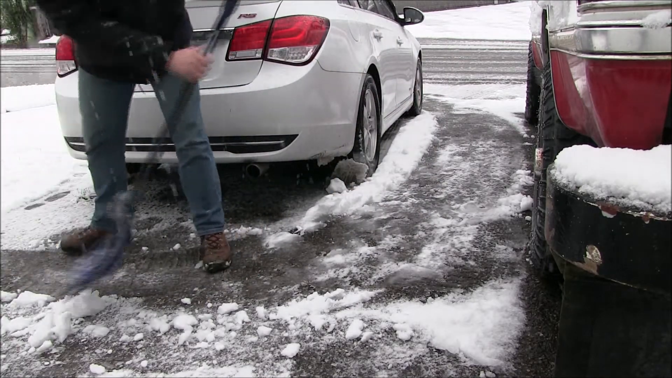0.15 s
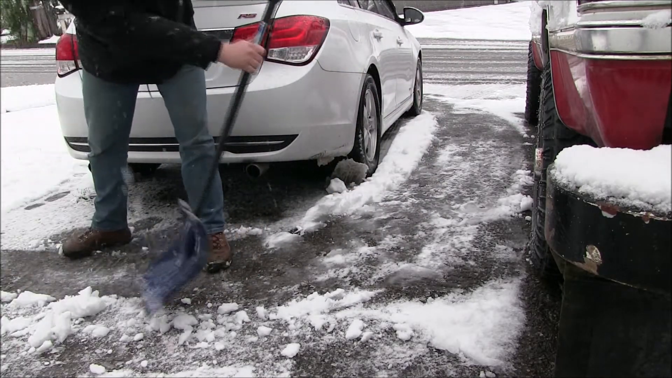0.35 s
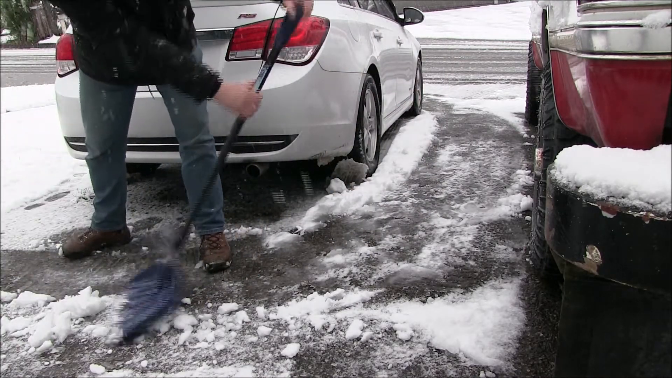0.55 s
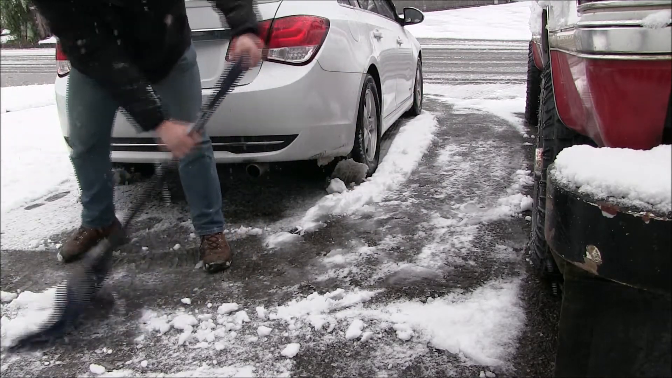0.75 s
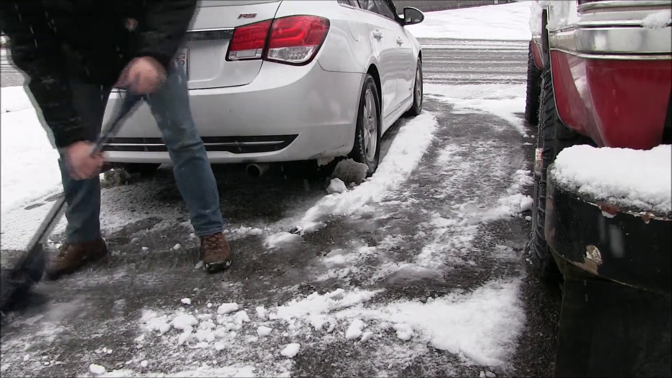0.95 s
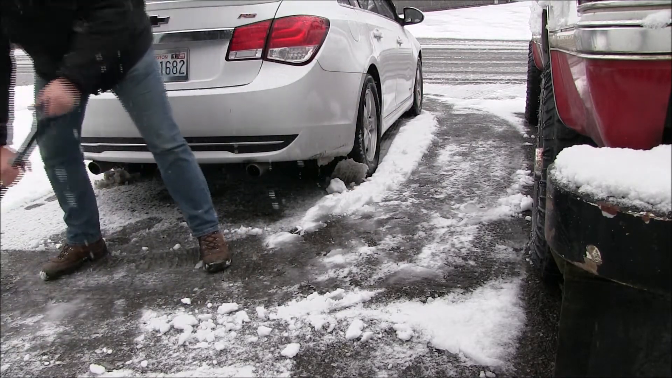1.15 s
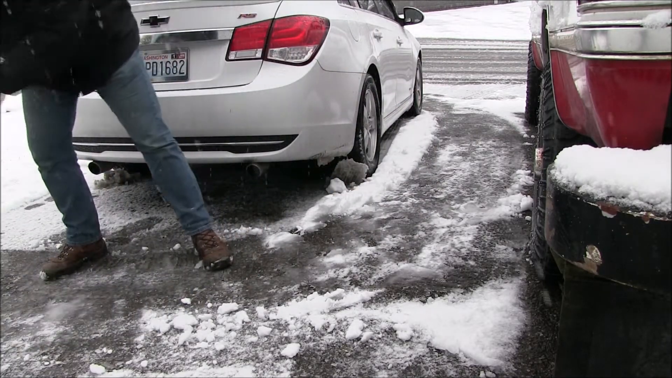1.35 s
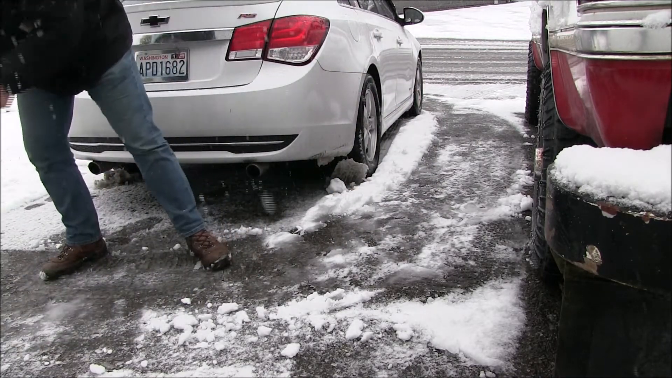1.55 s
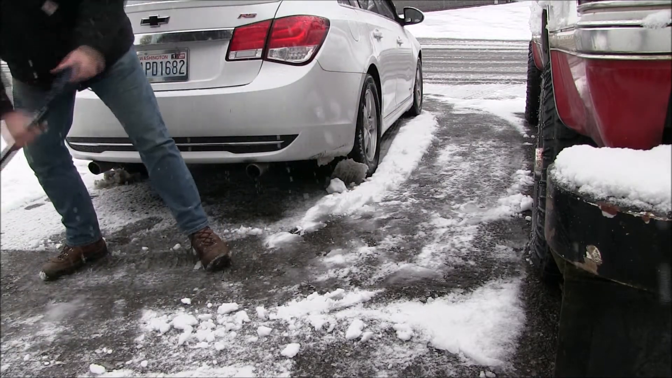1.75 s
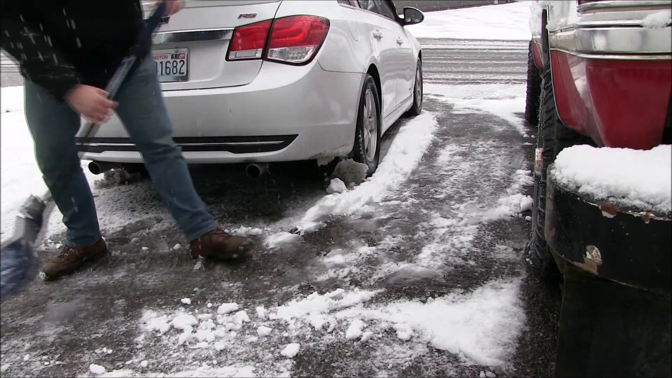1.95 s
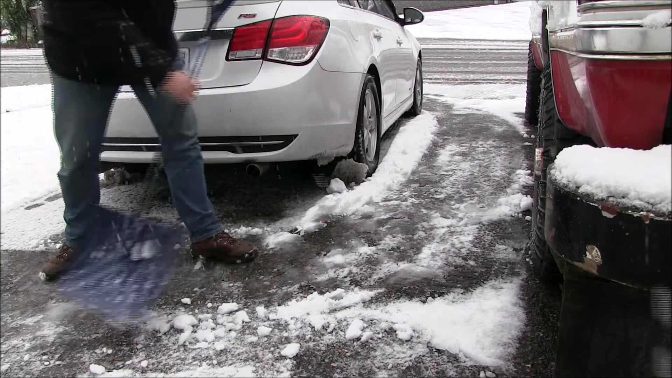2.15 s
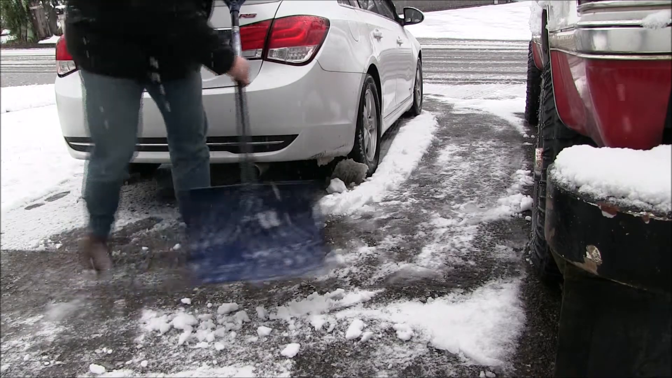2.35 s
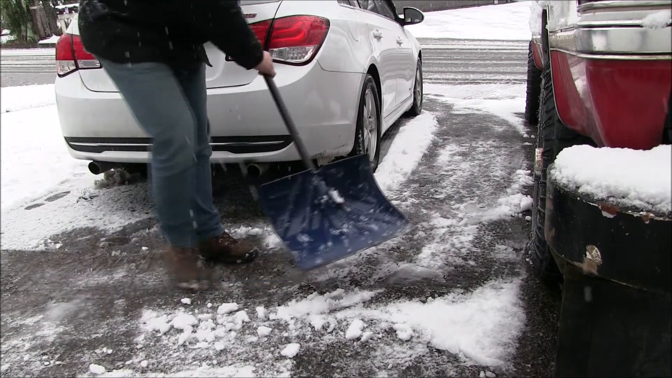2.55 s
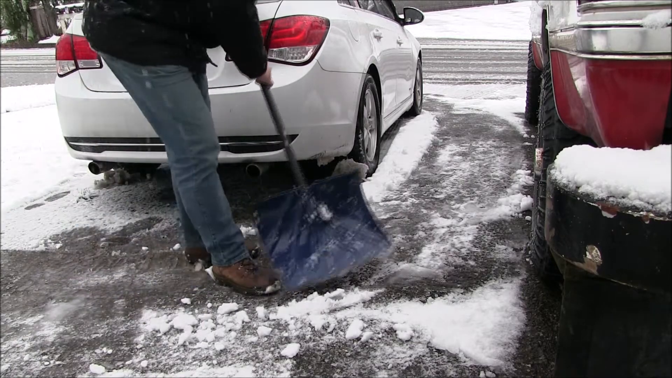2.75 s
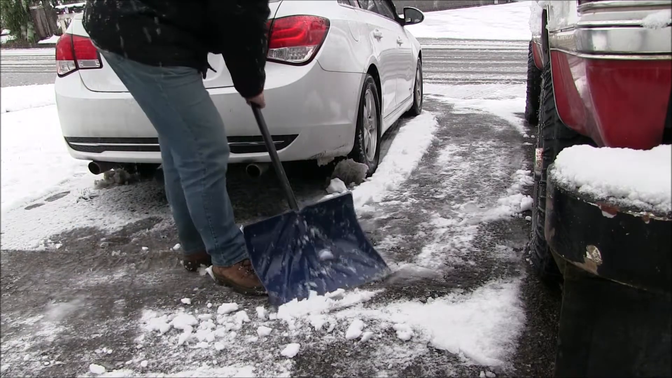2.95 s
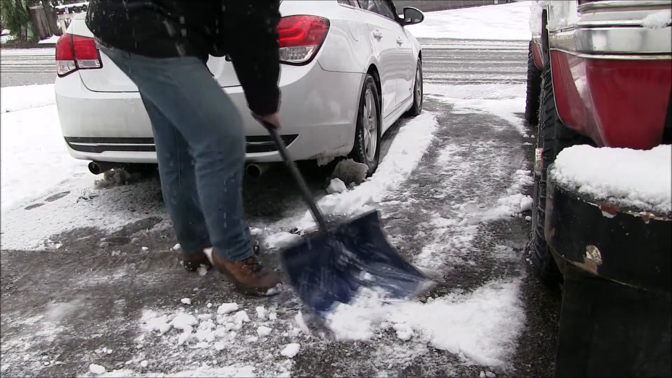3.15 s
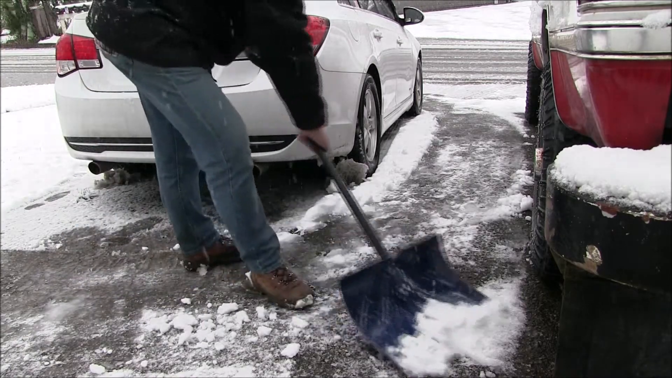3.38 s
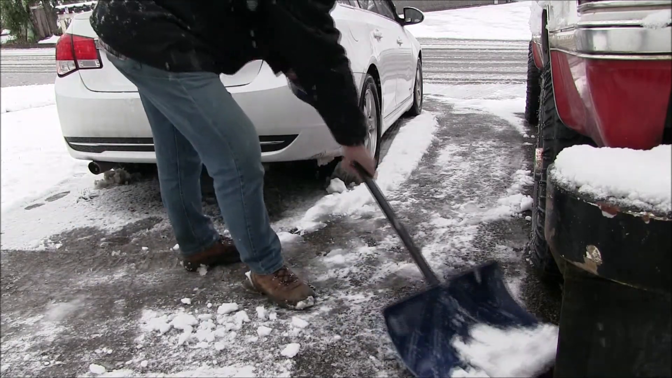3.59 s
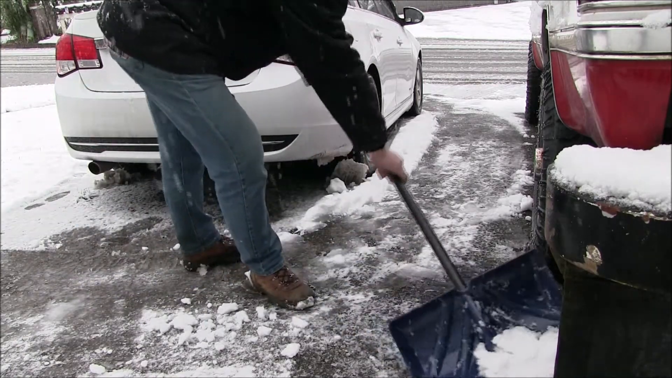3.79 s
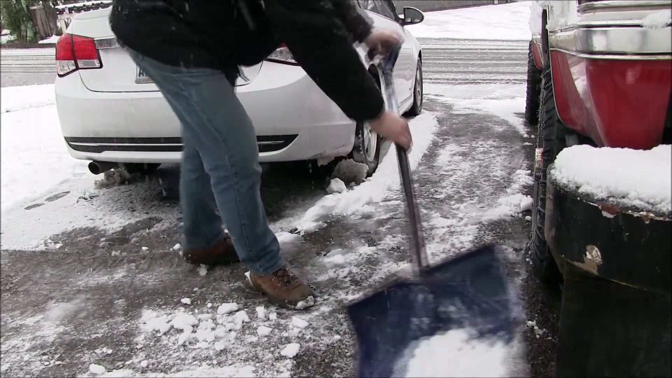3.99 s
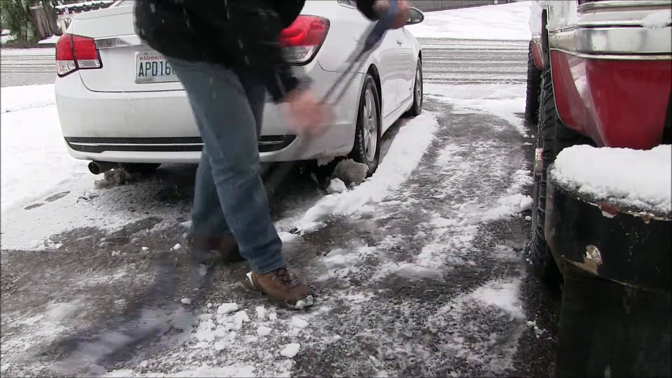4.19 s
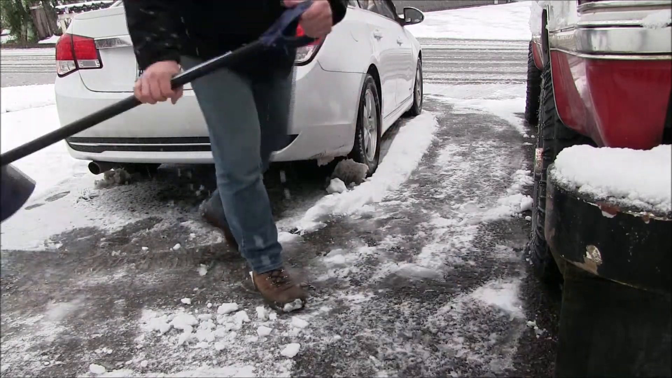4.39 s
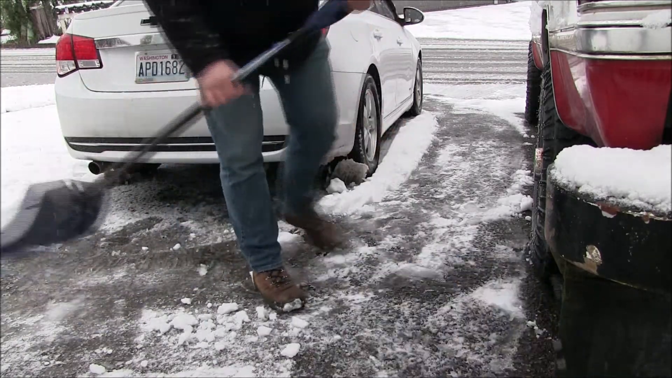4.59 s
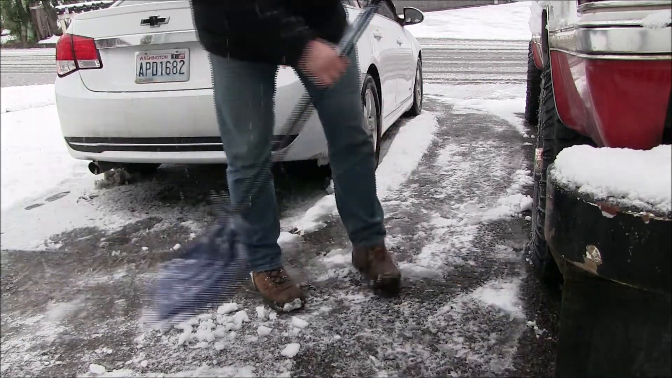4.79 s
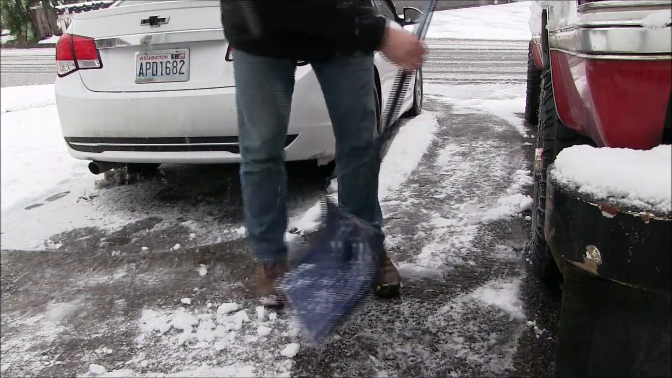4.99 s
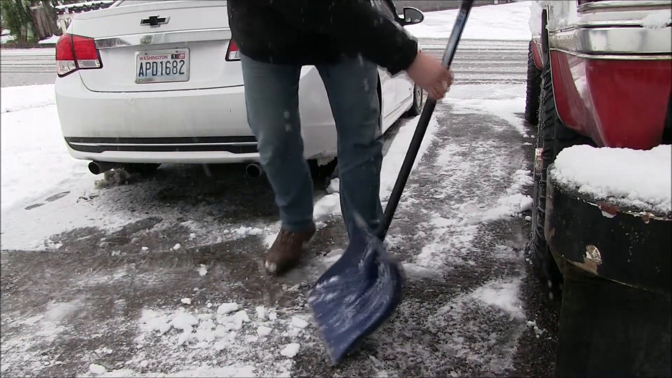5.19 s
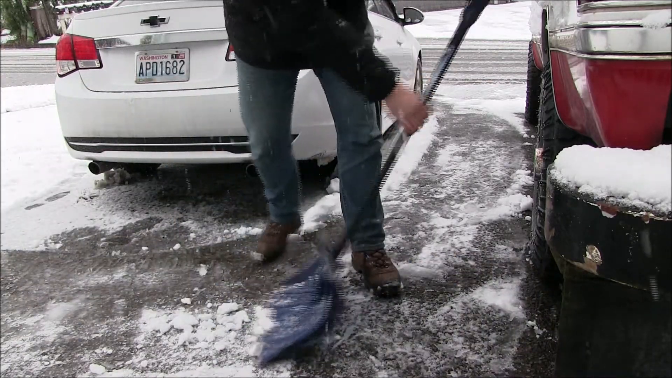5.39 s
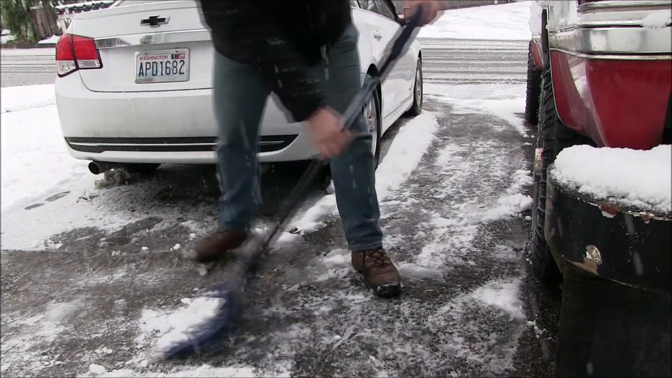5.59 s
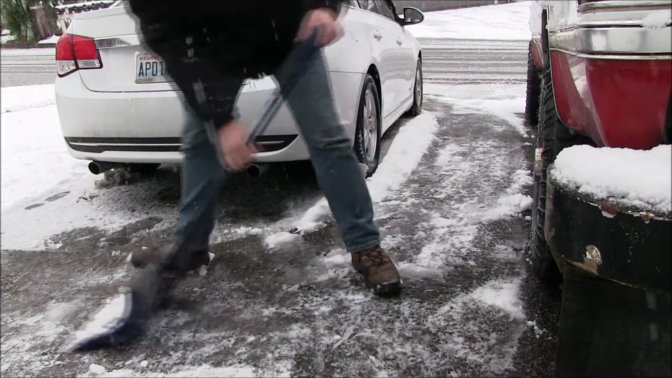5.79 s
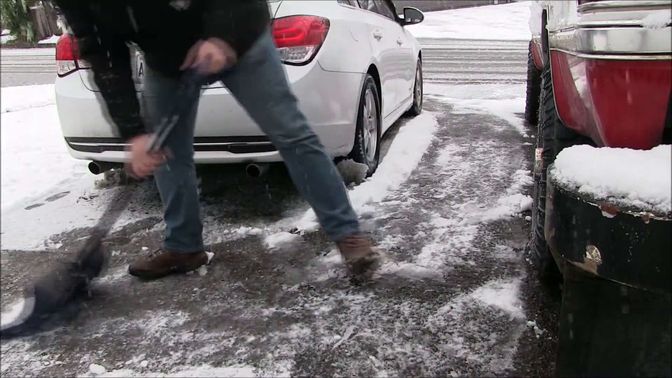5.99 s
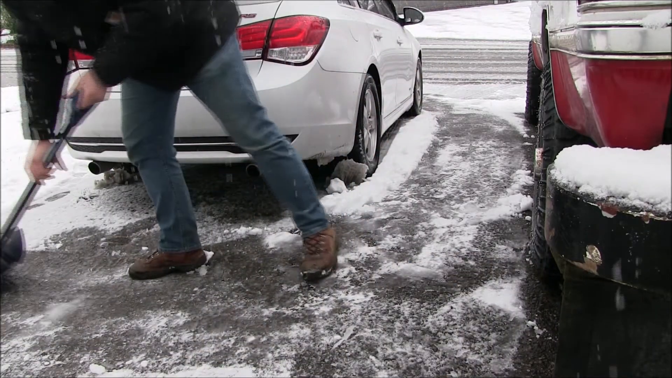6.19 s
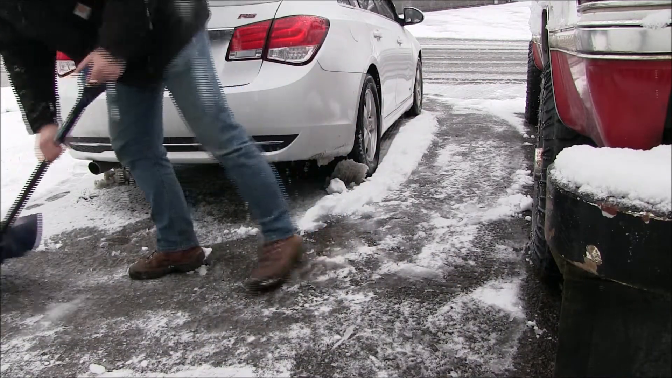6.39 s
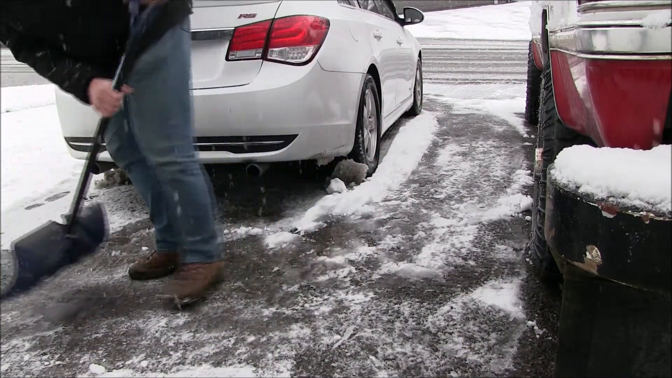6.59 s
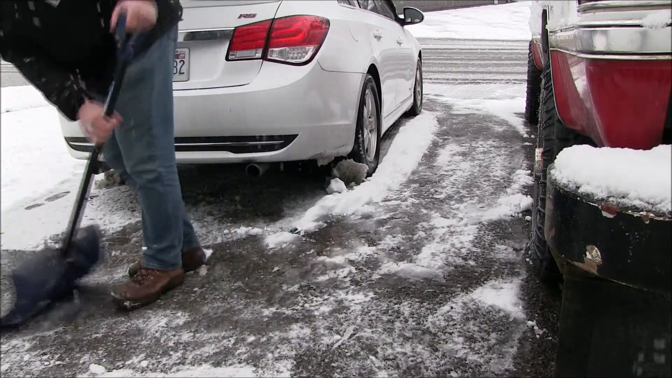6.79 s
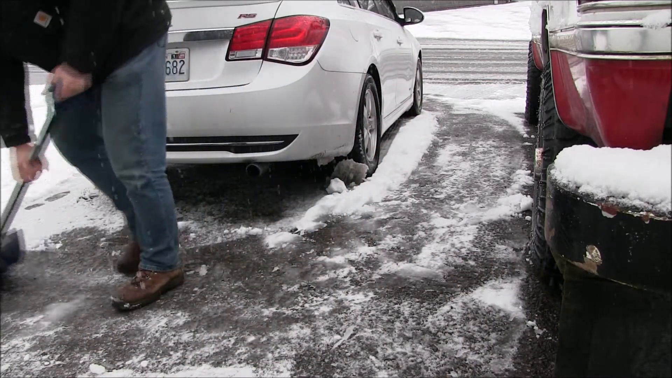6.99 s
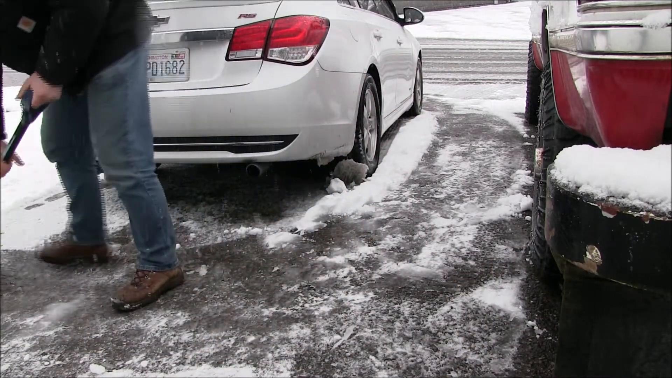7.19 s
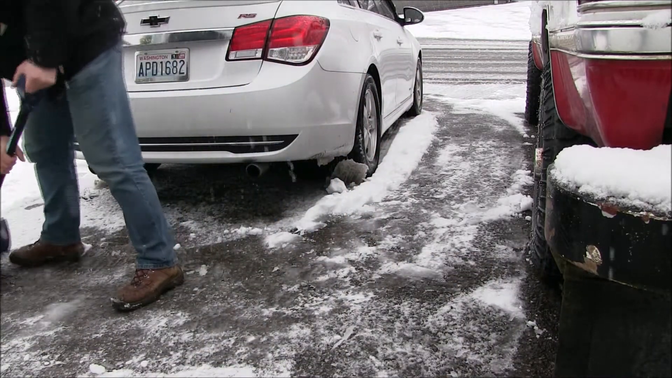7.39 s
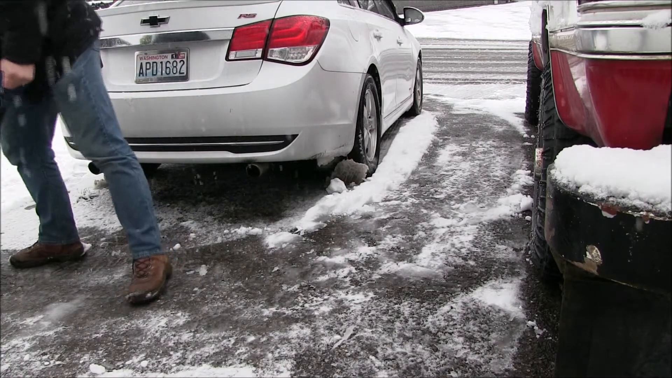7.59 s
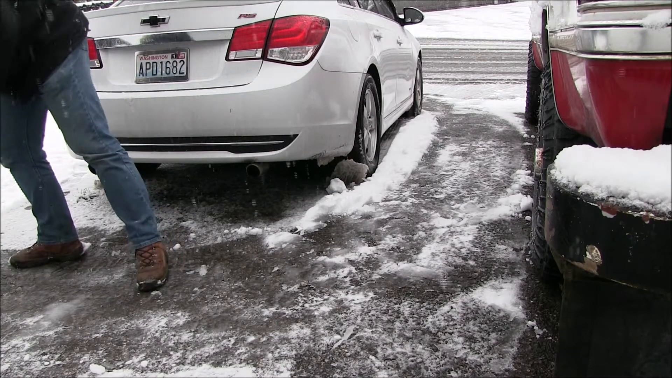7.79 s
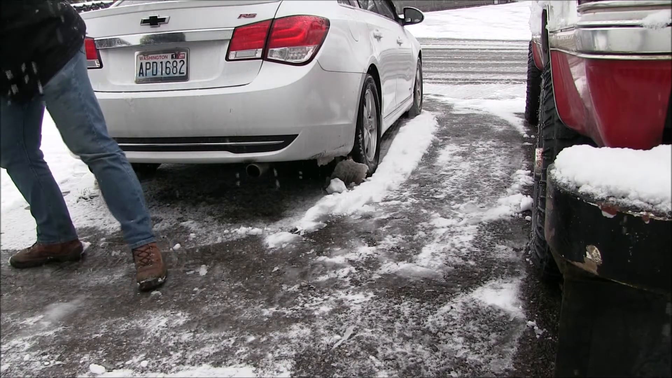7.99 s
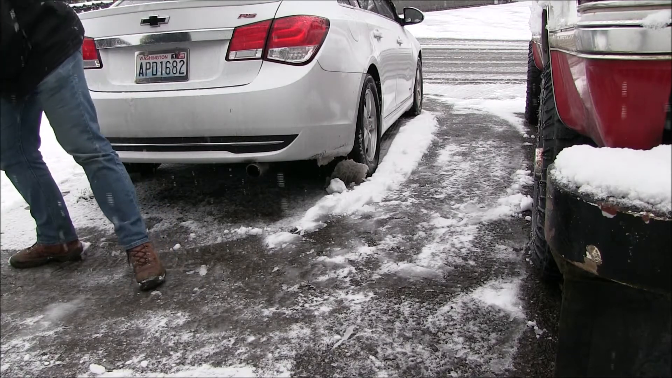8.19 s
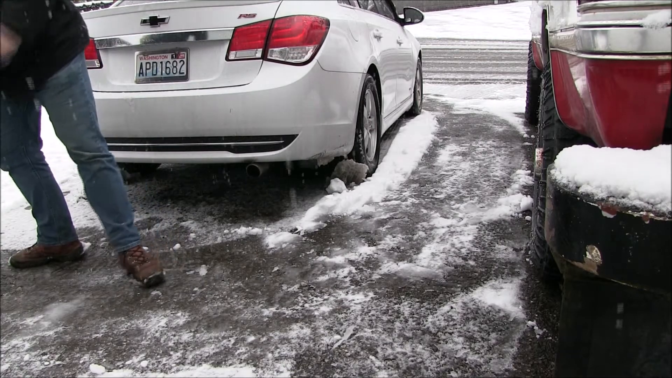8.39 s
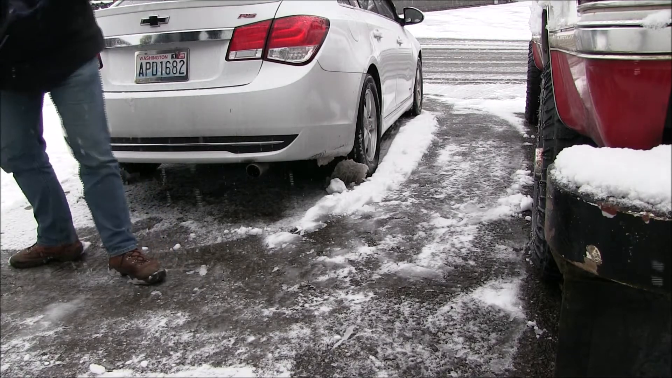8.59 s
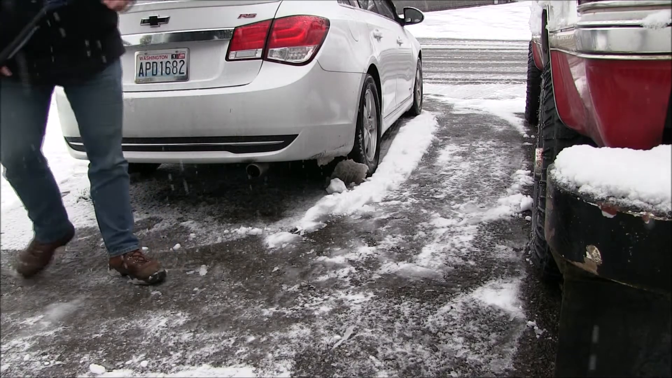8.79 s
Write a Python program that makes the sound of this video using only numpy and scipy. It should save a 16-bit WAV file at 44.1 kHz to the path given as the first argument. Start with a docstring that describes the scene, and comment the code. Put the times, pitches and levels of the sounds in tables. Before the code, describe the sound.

Close outdoor sound in a wet, snowy driveway with faint street rush behind. Small ice ticks and a soft slush shuffle open. From about 0.6 to 1.3 seconds the plastic shovel knocks and scrapes in a bright, rough sideways stroke. Until 2.8 seconds there are only quiet squelches, spatter and boot shuffles. At 2.9 a heavier hollow push grinds through slush until about 3.7, with low boom and gritty rasp, then slush plops around 3.7, 4.4 and 5. Another push runs from 5.3 to 6, turning into a brisk sweep until 6.3. Shorter choppy ploughing scrapes with thumps and clacks follow at 6.8 to 7.2 and 7.4 to 7.9. A soft squelch lands at 8. Wet tyre hiss, building gently, swells strongly after 8.3 with a faint falling engine hum, loudest at the end.

```python
"""A plastic snow shovel is set down on wet asphalt and shoved through slush, stroke after stroke.
Stick-slip bursts, sliding grains and grit ticks drive the blade's resonances; knocks add brief rattles.
Between strokes boots shuffle and slush lands, as swelling clumps of tiny bursts; crumbs of ice tick.
Behind is the rush of a wet street in filtered noise, where tyre hiss swells at the end.
The recorder's gain control ducks under loud strokes and gradually lets the street back in."""
import sys
import numpy as np
from scipy import signal
from scipy.fft import rfft, irfft, next_fast_len
from scipy.io import wavfile
from scipy.ndimage import uniform_filter1d, minimum_filter1d, map_coordinates

SR = 44100
rng = np.random.default_rng(int(sys.argv[2]) if len(sys.argv) > 2 else 0)


def int16_out(signal):
    """Quantize to a 16-bit WAV file."""
    q = np.round(np.clip(np.atleast_2d(signal).T, -1, 1) * 32767)
    wavfile.write(sys.argv[1], SR, q.astype(np.int16))


N = 390285


def amp(db):
    """Decibels to gain."""
    return 10 ** (np.asarray(db) / 20)


def unit(x):
    """Scaled to rms 1."""
    return x / np.sqrt(np.mean(x ** 2) + 1e-20)


def along(points, hz):
    """(Hz, value) points read on a log frequency axis."""
    f, v = np.transpose(points)
    return np.interp(np.log(hz + 1), np.log(f + 1), v)


def wobble(rate):
    """A smooth random curve, rate knots a second."""
    knots = rng.standard_normal(int(N * rate / SR) + 4)
    return map_coordinates(knots, [np.arange(N) * rate / SR])


def coloured(x, level_db, size=8192):
    """x through the causal, minimum-phase filter whose gain is level_db(Hz)."""
    gain = amp(level_db(np.fft.rfftfreq(size, 1 / SR)))
    cepstrum = irfft(np.log(np.maximum(gain, 1e-6)))
    # folding the cepstrum onto positive time makes the filter causal
    cepstrum[1:size // 2] *= 2
    cepstrum[size // 2 + 1:] = 0
    impulse = irfft(np.exp(rfft(cepstrum)))
    return signal.fftconvolve(x, impulse)[:len(x)]


def split(x, edges_hz, order=6):
    """Adjacent bands that add up to x."""
    m = next_fast_len(len(x) + SR // 10)
    hz = np.fft.rfftfreq(m, 1 / SR)
    below = [0 * hz] + [1 / (1 + (hz / edge) ** order) for edge in edges_hz] + [0 * hz + 1]
    return irfft(np.diff(below, axis=0) * rfft(x, m), m)[:, :len(x)]


def steady(x, seconds):
    """Slow level evened out to rms 1, the fine grain kept."""
    power = np.abs(uniform_filter1d(x ** 2, int(seconds * SR) + 1))
    return x / np.sqrt(power + 1e-12)


def grains(rate, spread_db):
    """Randomly timed contacts of log-normal size, about rate a second, rms 1."""
    size = amp(spread_db * np.clip(rng.standard_normal(N), -2, 2))
    struck = rng.random(N) < rate / SR
    return unit(struck * size * rng.choice([-1, 1], N))


def street(patter_db=-14, rush_db=-37.0, fizz_db=-54):
    """Distant traffic as coloured, wavering noise, with a fine patter of wet flakes."""
    # street colour: pitch_hz [Hz], gain_db [dB]
    street_tone = [(15, -61), (25, -24), (64, -6), (114, 1), (344, -8), (405, -6.5), (531, -7.5), (624, -8),
                   (840, -8), (1190, -9), (1890, -16.5), (2220, -24), (3160, -21), (11600, -37),
                   (16000, -41)]
    flakes = grains(160, spread_db=5)
    air = rng.standard_normal(N) + amp(patter_db) * flakes
    rumble, rush, fizz = split(coloured(air, lambda hz: along(street_tone, hz)), [220, 4000])
    body = unit(rumble * amp(2.8 * wobble(16)) + rush)
    top = unit(fizz * amp(0.3 * wobble(29)))
    return amp(rush_db) * body + amp(fizz_db) * top


def slush(level_db=0, clump_db=1.0):
    """Wet snow squeezed by a sole or landing in a heap: clumps of tiny bursts that swell and die away."""
    # colour of wet snow: pitch_hz [Hz], gain_db [dB]
    slush_tone = [(71, -8.5), (120, -4), (427, -2), (473, -9.5), (605, -1.5), (757, -5.5), (1070, -4),
                  (2150, -8.5), (3740, -15.5), (7980, -24.5), (16000, -37)]
    # boots and thrown slush: middle_s [s], length_s [s], squelch_db [dB], spatter_db [dB]
    steps = [ (0.02, 0.098, -57, -46), (0.292, 0.18, -38, -43.5), (0.465, 0.15, -46, -52),
             (1.386, 0.092, -27.5, -45), (1.513, 0.12, -37, -37.5), (1.722, 0.3, -55, -53),
             (1.96, 0.044, -46, -38.5), (2.03, 0.12, -39.5, -44.5), (2.133, 0.046, -38, -36.5),
             (2.363, .04, -42, -45), (2.397, .025, -52, -39), (2.608, 0.037, -37.5, -43.5),
             (2.771, .14, -29, -34.5), (3.697, 0.095, -23.5, -38), (4.247, 0.28, -47, -51.5),
             (4.403, 0.072, -26.5, -33), (4.477, 0.1, -53, -45), (4.75, .25, -42.5, -52.5),
             (4.937, 0.15, -32.5, -40.5), (5.041, 0.056, -31, -42), (5.147, 0.25, -35.5, -44),
             (6.017, 0.15, -49, -37.5), (6.372, 0.14, -32, -43), (6.517, 0.15, -43, -45.5),
             (6.823, 0.031, -29, -32), (7.292, 0.07, -33, -55), (8.028, 0.071, -25, -37.5),
             (8.094, 0.064, -36, -40), ]
    clumps = unit(grains(2200, spread_db=1.5) * amp(clump_db * wobble(90)))
    bursts = clumps + 0.73 * rng.standard_normal(N)
    # squelch below 4 kHz, spatter above
    squelch_spatter = split(coloured(bursts, lambda hz: along(slush_tone, hz)), [4000])
    t = np.arange(N) / SR
    swells = np.zeros((2, N))
    for middle, length, *band_db in steps:
        swell = np.exp(-np.minimum((2 * (t - middle) / length) ** 2, 20))
        swells += np.outer(amp(band_db), swell)
    return amp(level_db) * np.sum(swells * steady(squelch_spatter, 0.048), axis=0)


def crumbs(t60=0.02, level_db=-7):
    """Each falling crumb of ice makes one short, bright tick: a burst of noise with a fast decay."""
    # crumbs landing: start_s [s], level_db [dB, before the overall trim]
    falls = [(0.2353, -24), (0.258, -31), (0.2853, -21), (0.4474, -30), (0.4973, -27), (1.8806, -31),
             (4.6443, -27)]
    out = np.zeros(N + SR)
    t = np.arange(SR // 20) / SR
    for start, db in falls:
        tick = unit(split(rng.standard_normal(len(t)), [2500, 9000])[1])
        out[round(start * SR):][:len(t)] += amp(db + level_db - 60 * t / t60) * tick
    return out[:N]


def chips(rate, centre_hz, cycles, spread_db=5):
    """Bits of grit snap, each a short tick at its own pitch that loses 60 dB in so many cycles."""
    draws = rng.standard_normal((int(rate * N / SR), 3))  # pitch, size, sign
    start = rng.integers(0, N, len(draws))[:, None]
    hz = np.clip(centre_hz * np.exp(.5 * draws[:, :1]), 1500, 14000)
    k = np.arange(SR // 120)
    turns = hz * k / SR
    envelope = amp(spread_db * np.clip(draws[:, 1:2], -2, 2) - 60 * turns / cycles)
    rings = envelope * np.sin(2 * np.pi * turns) * np.sign(draws[:, 2:])
    # higher ticks are stronger in proportion to pitch
    return unit(np.bincount((start + k).ravel(), (rings * hz).ravel(), N)[:N])


def knocks(thump_t60=0.11, knock_t60=0.05, clack_t60=0.068, crack_t60=0.042, level_db=-2):
    """A blow sets off a brief rattle of grains and grit in four bands, each with its own decay."""
    # colour of a blow: pitch_hz [Hz], gain_db [dB]
    blow_tone = [(50, -35), (110, -13.5), (200, -0.5), (550, -1), (1500, -6.5), (3500, -17.5),
                 (7000, -20.5), (11000, -33.5), (16000, -47)]
    # the edge lands or catches on a stone, or a heel comes down: start_s [s],
    # knock_db [dB, before the overall trim], then thump_db, clack_db, crack_db [dB re the knock]
    blows = [ (0.312, -18, -8, -16, -16), (0.322, -18, -13, -14, -15), (0.583, 3, -15, -11, -13.5),
             (0.767, 8.5, -30, -1.5, -18), (0.777, -7, -14, -7, -3), (0.864, 4, -22, -4, -11),
             (0.874, -5.5, -4, 4.5, 1), (0.889, -12.5, 0, -4, -3), (0.936, 9, -30, -20, -27),
             (1.023, 2.5, -27, -5.5, -22), (1.219, -6, -22, -5.5, 1), (1.966, -42, -3, 4, 10),
             (2.105, -37, 8, 2, 10), (2.683, -35.5, -3, 9.5, 7.5), (2.781, -29, -6, 14, 16.5),
             (2.895, -25.5, -6, 15.5, 3.5), (2.926, -2, 3, -21, -15), (2.966, -6, 7, -17, -29),
             (3.022, -11.5, -5, 0, -5.5), (3.199, -0.5, -13, -5, -21), (3.621, -5.5, -17, 3, -10),
             (3.752, -19, 2, -6.5, -13), (4.366, -26, -14, 1, -12), (4.914, -35.5, 13, 10.5, 14),
             (5.307, 0.5, -3.5, -13, -13), (5.666, -10, 2, 9.5, 3), (5.741, 5.5, -9, -7, -14),
             (5.849, 3, -21, -10, -20), (5.911, 2.5, -31.5, -20, -16.5), (5.955, -5, -19, -14, -12),
             (6.082, 7, -26, -18, -20), (6.097, 6, -24, -23, -24), (6.232, -6.5, -12, -3, 2.5),
             (6.292, -12, -22, -8, 2), (6.838, -10.5, 15.5, -11, 3), (6.912, 1, -22, -6, -13),
             (7.144, -16.5, -4, 11, 8.5), (7.421, -4.5, 4, -6, -4), (7.497, -7.5, 7, -5, 11.5),
             (7.612, -8.5, 0, 5, 5.5), (7.666, -2, -15, -17, -4), (7.794, -7, 5, 0, -4),
             (7.879, -6, -19, -6, -10), ]
    out = np.zeros(N + SR)
    t = np.arange(SR // 5) / SR
    force = grains(5000, spread_db=3) + chips(900, centre_hz=5500, cycles=35, spread_db=3)
    rattle = steady(split(blade(force, blow_tone), [380, 1700, 3800]), .012)
    t60s = np.array([[thump_t60], [knock_t60], [clack_t60], [crack_t60]])
    decay = amp(-60 * t / t60s) * (1 - np.exp(-t / 0.0017))  # soft onset
    for s, db, thump_db, clack_db, crack_db in blows:
        start = round(s * SR)
        bands = amp(db) * amp([thump_db, 0, clack_db, crack_db])
        out[start:start + len(t)] += bands @ (decay * rattle[:, start:start + len(t)])
    return amp(level_db) * out[:N]


def shifting(x, depth_db, size=1024):
    """Flex and snow load keep changing which of the blade's resonances speak."""
    z = signal.stft(x, nperseg=size)[2]
    # random gains smoothed over frequency, then over time
    field = uniform_filter1d(uniform_filter1d(rng.standard_normal(z.shape), 3, 0), 9, 1)
    reach = 1 / (1 + np.fft.rfftfreq(size, 1 / SR)[:, None] / 3000)  # less change in the treble
    return signal.istft(z * amp(depth_db * reach * unit(field)), nperseg=size)[1][:len(x)]


def blade(force, tone):
    """The blade's answer to a force at its edge: a broad colour lifted at its resonances."""
    # resonances of the blade: centre_hz [Hz], width_hz [Hz], lift_db [dB]
    resonances = [(296, 38, 2), (442, 95, 4), (579, 170, 5), (725, 79, 2.5), (1009, 31, 3.5),
                  (1230, 200, 1.5), (1498, 17, 4), (1990, 150, 1.5), (2750, 250, 0.5), (2920, 82, -0.5)]

    def response_db(hz):
        lift = sum(db / (1 + (2 * (hz - centre) / width) ** 2) for centre, width, db in resonances)
        return along(tone, hz) + lift

    return shifting(coloured(force, response_db), depth_db=3.6)


def effort(grip):
    """Gains of boom, rasp and grit: in each stretch the edge bites, holds a drifting level, and slides to rest."""
    # The blade is swept sideways over nearly bare asphalt, pushed flat and forward, or ploughs into deep
    # slush. One row for each stretch of a shove, a long shove taking several:
    # start_s [s], length_s [s], bite_s [s], release_t60_s [s],
    # level_db [dB, before pressure and mix trim], rasp_db and grit_db [dB re level],
    # fade_db [dB lost over the length, negative grows], grip [name]
    stretches = [ (0.588, 0.068, 0.009, 0.46, -8.5, 2.5, -9, -3, "sweep"),
                 (0.751, 0.02, 0.017, 0.2, -9, -1, -8, 1, "sweep"),
                 (0.802, .06, 0.018, 0.22, -27.5, 2.5, 0, -6, "sweep"),
                 (0.862, 0.084, .01, 0.11, -17, 2, -9, 4.5, "sweep"),
                 (0.954, 0.064, 0.031, 0.27, -10, 5, -8, 0, "plough"),
                 (1.035, 0.23, 0.017, 0.24, -11, 1, -11, 1, "plough"),
                 (2.924, 0.038, .003, 0.083, -6, -4, -17.5, 2.5, "push"),
                 (3.008, 0.064, 0.052, 0.15, 0.5, -6.5, -21.5, 0.5, "push"),
                 (3.092, 0.11, 0.0076, .6, -7.5, -3.5, -18, -2, "push"),
                 (3.22, 0.091, 0.019, 0.83, -6, -3.5, -18.5, 1, "push"),
                 (3.336, .13, 0.051, 0.32, 0.5, -1.5, -14.5, 1.5, "push"),
                 (3.474, 0.14, 0.064, 0.17, -3.5, -2.5, -18, -1, "push"),
                 (5.303, 0.027, 0.0068, 0.46, -3, -3, -15.5, 0.5, "push"),
                 (5.361, .19, 0.023, .3, -6, 2.5, -12, 0, "push"),
                 (5.58, .17, 0.033, 0.46, -7, 0.5, -13, 0.5, "push"),
                 (5.771, 0.14, 0.024, 0.14, -7, -1, -12.5, 6, "push"),
                 (5.942, 0.016, 0.0087, 0.22, -18, 0.5, -6.5, 2.5, "push"),
                 (6.061, 0.041, 0.023, 0.22, -6, -4, -15, -1, "sweep"),
                 (6.134, 0.091, 0.056, 0.35, -3.5, 0.5, -10.5, 4, "sweep"),
                 (6.835, 0.043, 0.0052, 0.21, -7, -1, -13.5, -2, "plough"),
                 (6.912, 0.087, 0.015, 1, -6, -0.5, -11.5, -0.5, "plough"),
                 (7.105, 0.054, 0.026, .3, -12, -6, -19, -1, "plough"),
                 (7.421, 0.1, 0.0037, 0.55, -7.5, -0.5, -13, 2, "plough"),
                 (7.543, 0.068, 0.023, 0.24, -8, 0.5, -12.5, 1, "plough"),
                 (7.64, 0.026, 0.024, 0.21, -9.5, 2.5, -13, 0.5, "plough"),
                 (7.689, 0.098, 0.057, .4, -8.5, 2, -14.5, -1.5, "plough"),
                 (7.812, 0.061, 0.023, 0.15, -7, 1.5, -16.5, 1.5, "plough"), ]
    total = np.zeros((3, N))
    for s, length, bite, t60, db, rasp_db, grit_db, fade_db, kind in stretches:
        if kind == grip:
            start = round(s * SR)
            t = np.arange(min(SR, N - start)) / SR
            held_db = db - fade_db * np.minimum(t / length, 1)
            release_db = -60 * np.maximum(t - length, 0) / t60
            shape = np.minimum(t / bite, 1) * amp(held_db + release_db)
            near = slice(start, start + len(t))
            total[:, near] = np.maximum(total[:, near], np.outer(amp([0, rasp_db, grit_db]), shape))
    # the arms' unsteady push: depth in dB, changes a second
    pressure_db, pressure_rate = 1.76, 22
    return total * amp(pressure_db * wobble(pressure_rate))


def scrape(grip, tone, slip_rate, slip_db, clump_db, crush_t60, chip_db):
    """The edge sticks and slips over the stones; every slip crushes a burst of grit."""
    travel = np.cumsum(slip_rate * amp(4 * wobble(160))) / SR
    slipped = np.diff(np.floor(travel), prepend=0)  # a slip at each whole step of travel
    slips = slipped * amp(4.9 * np.clip(rng.standard_normal(N), -2, 2))
    t = np.arange(SR // 40) / SR
    bursts = signal.fftconvolve(slips, amp(-60 * t / crush_t60))[:N]
    crushing = unit(bursts * rng.standard_normal(N))
    sliding = unit(grains(4000, spread_db=2.5) * amp(clump_db * wobble(110)))
    ticks = chips(450, centre_hz=6500, cycles=25)
    force = sliding + amp(slip_db) * crushing + amp(chip_db) * ticks
    boom_rasp_grit = split(blade(force, tone), [800, 3500])
    return np.sum(effort(grip) * steady(boom_rasp_grit, 0.0258), axis=0)


def passing_car(spray_db=-10.5, mist_db=-31, spray_follows=0.67, flutter_db=.8, rumble_db=-20,
                engine_db=-1.0, sag=.04):
    """Wet tyres roar louder as a car draws near, their spray more gently; a faint engine hum falls in pitch."""
    # swell of the tyre roar: time_s [s], level_db [dB, before flutter]
    approach = [(6.3, -46), (6.8, -36), (7.3, -32), (8.1, -28.5), (8.3, -25), (8.7, -20), (8.85, -18)]
    # colour of the wet tyres: pitch_hz [Hz], gain_db [dB]
    tyre_tone = [(260, -45), (450, -26), (523, -17), (664, -14), (694, -13), (993, -8.5), (1120, -1),
                 (2010, 1), (3050, -10), (3280, -15), (3930, -19), (4430, -22.5), (6630, -28), (13800, -50),
                 (16000, -57)]
    # engine partials: pitch_hz [Hz, before the fall], level_db [dB, before wobble, trim and fade]
    partials = [(90, -44), (134, -41.5), (280, -43.5)]
    t = np.arange(N) / SR
    water = rng.standard_normal(N) + 0.53 * grains(700, spread_db=5)
    wet_bands = split(coloured(water, lambda hz: along(tyre_tone, hz)), [3300, 9000])
    roar, spray, mist = steady(wet_bands, .1)
    rumble = unit(split(rng.standard_normal(N), [80, 330])[1])
    level_db = np.interp(t, *np.transpose(approach)) + flutter_db * wobble(25)
    # spray starts nearer its final level, so it rises less than the roar
    spray_gain = amp((1 - spray_follows) * np.clip(approach[-1][1] - level_db, 0, 10))
    wet = spray_gain * (amp(spray_db) * spray + amp(mist_db) * mist)
    tyres = amp(level_db) * (roar + amp(rumble_db) * rumble + wet)
    turns = np.cumsum(1 - sag * (t - 8.45) + 0.0148 * wobble(16)) / SR  # sag: share of pitch a second
    hum = sum(amp(db + 3 * wobble(12)) * np.sqrt(2) * np.sin(2 * np.pi * hz * turns) for hz, db in partials)
    return tyres + amp(engine_db) * hum * np.interp(t, [7.95, 8.3, 8.9], [0, 1.3, .5])


def scattered(x, t60, share, count=16):
    """Nearby surfaces return a short diffuse echo that changes as the shovel moves about."""
    t = np.arange(SR // 4) / SR
    tails = rng.standard_normal((count, len(t))) * amp(-60 * t / t60)
    tails /= np.linalg.norm(tails, axis=1, keepdims=True)
    echo, start = np.zeros(N + len(t)), 0
    # each successive stretch of sound gets its own echo tail
    for piece, tail in zip(np.array_split(x, count), tails):
        echo[start:start + len(piece) + len(t) - 1] += signal.fftconvolve(piece, tail)
        start += len(piece)
    return x + share * echo[:N]


def gain_control(x, threshold_db=-9.0, recovery_db_per_s=13, window_s=0.035):
    """The gain drops at once when the short-term level passes the threshold and creeps back at a steady rate."""
    power = np.abs(uniform_filter1d(x ** 2, int(window_s * SR) + 1))
    excess_db = np.maximum(10 * np.log10(power + 1e-12) - threshold_db, 0)
    recovered_db = recovery_db_per_s * np.arange(N) / SR
    # the running maximum holds the deepest cut, less what has been recovered since
    return x * amp(recovered_db - np.maximum.accumulate(excess_db + recovered_db, axis=-1))


def scene():
    """Shovel and boots, answered by the parked cars, in front of the street."""
    # blade colour in each grip: pitch_hz [Hz], gain_db [dB]
    sweep_tone = [(29, -46), (50, -47), (138, -24), (189, -7), (291, 0), (495, -5), (559, 2), (1180, -3.5),
                  (1580, -3.5), (1820, -7), (2160, -7), (5810, -20.5), (13200, -40.5), (16000, -48)]
    plough_tone = [(29, -60), (50, -41.5), (229, -2.5), (271, -4.5), (306, -1), (428, -1), (483, -4.5),
                   (601, -2), (1470, -11), (1700, -14), (2750, -19), (3850, -23), (7040, -27), (13500, -46),
                   (16000, -53)]
    push_tone = [(29, -97), (50, -52), (208, -9), (258, -10), (291, -2.5), (371, -5.5), (408, -0.5),
                 (507, -5), (572, -0.5), (822, -7.5), (1270, -5), (3180, -16.5), (6240, -32),
                 (11700, -49.5), (16000, -57)]
    # slip_rate in slips a second before its wobble, crush_t60 in seconds
    sweeps = scrape("sweep", sweep_tone, slip_rate=130, slip_db=-1, clump_db=-1.5,
                    crush_t60=0.0089, chip_db=-4.5)
    ploughs = scrape("plough", plough_tone, slip_rate=103, slip_db=-3, clump_db=-1.0,
                     crush_t60=0.016, chip_db=-2.5)
    pushes = scrape("push", push_tone, slip_rate=130, slip_db=-1.5, clump_db=2.5,
                    crush_t60=0.02, chip_db=-7.0)
    shovel = amp(3.5) * sweeps + amp(-0.4) * ploughs + amp(-1.7) * pushes
    near = shovel + knocks() + slush() + crumbs()
    return (scattered(near, t60=0.091, share=0.33) + street() + passing_car())[None]


def record(dry, low_cut_hz=48, top_hz=15850):
    """Gain control, then a fast limiter for the highest peaks; deep bass is cut and the band ends at top_hz."""
    ducked = gain_control(dry)
    needed = np.minimum(1, .97 / (np.abs(ducked) + 1e-9))
    held = ducked * uniform_filter1d(minimum_filter1d(needed, size=129), size=129)
    m = next_fast_len(N + SR // 10)
    hz = np.fft.rfftfreq(m, 1 / SR)
    response = hz ** 2 / (hz ** 2 + low_cut_hz ** 2) * (hz < top_hz)
    return irfft(rfft(held, m) * response, m)[:, :N]


dry = scene()
out = record(dry)
int16_out(out)
```